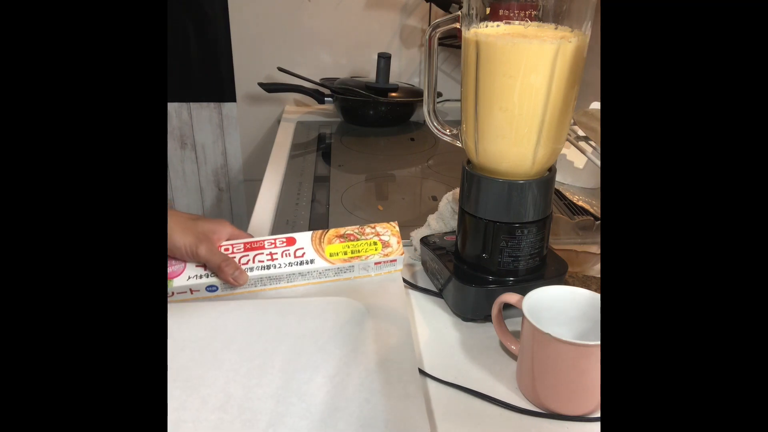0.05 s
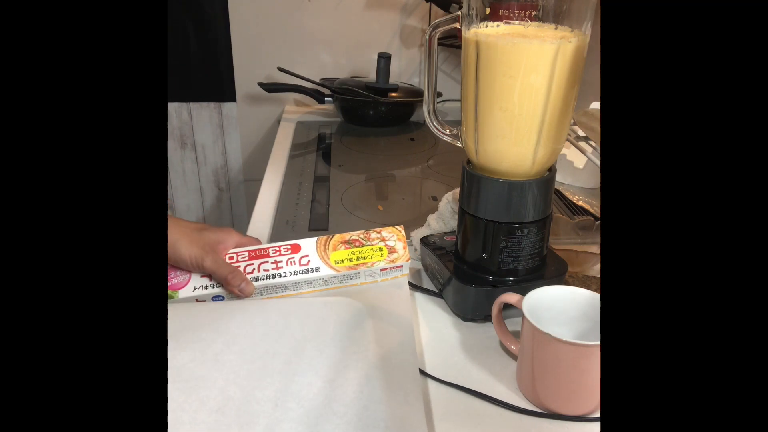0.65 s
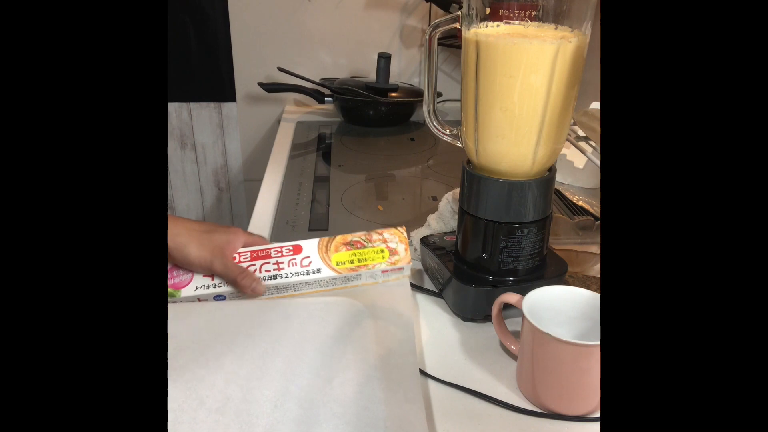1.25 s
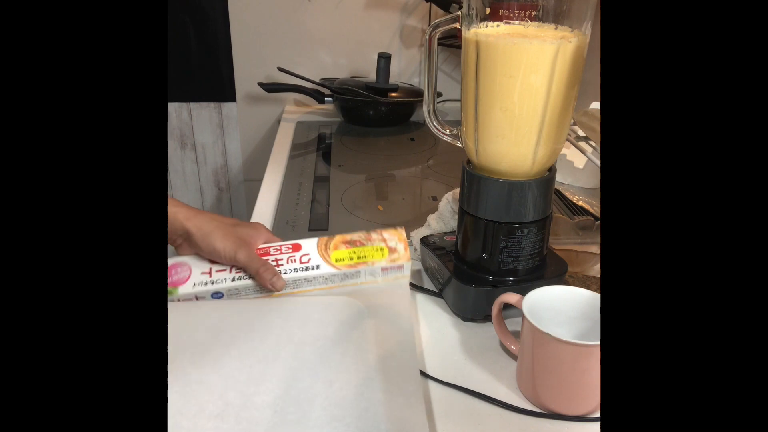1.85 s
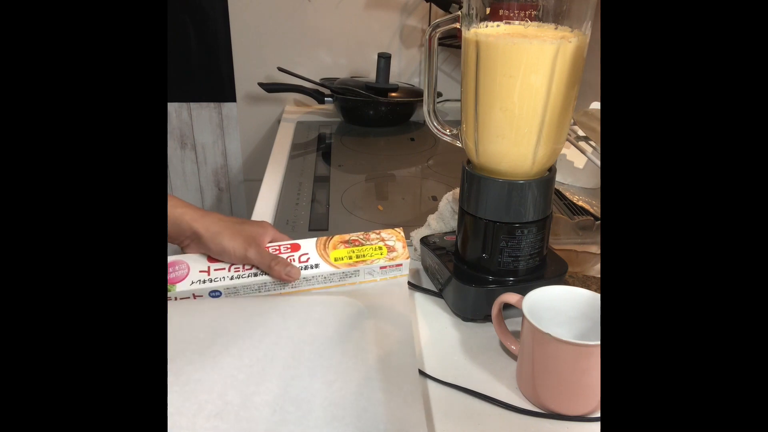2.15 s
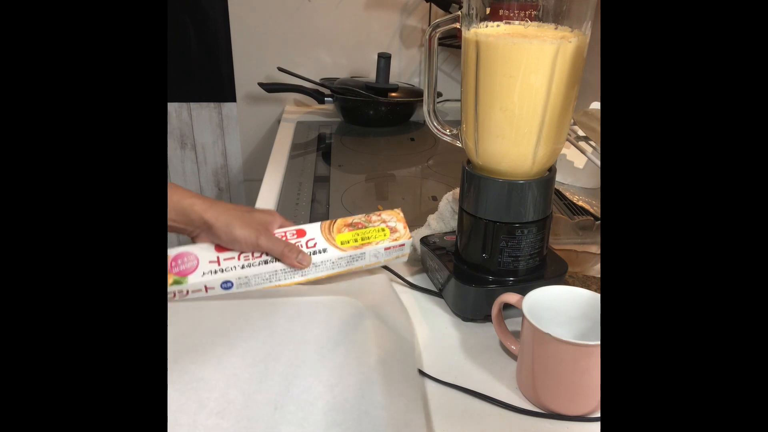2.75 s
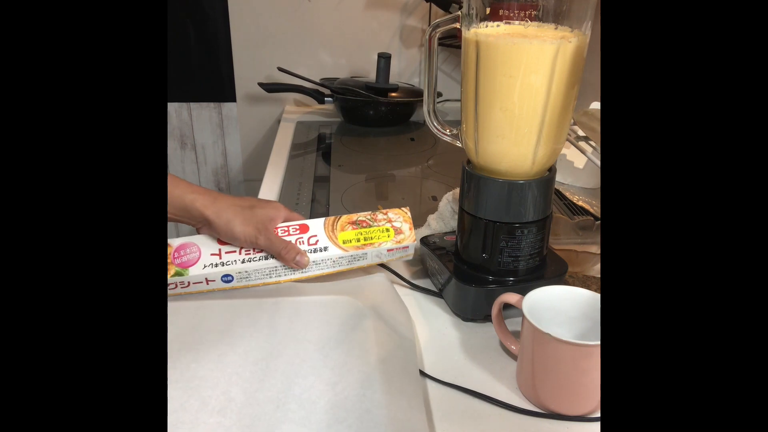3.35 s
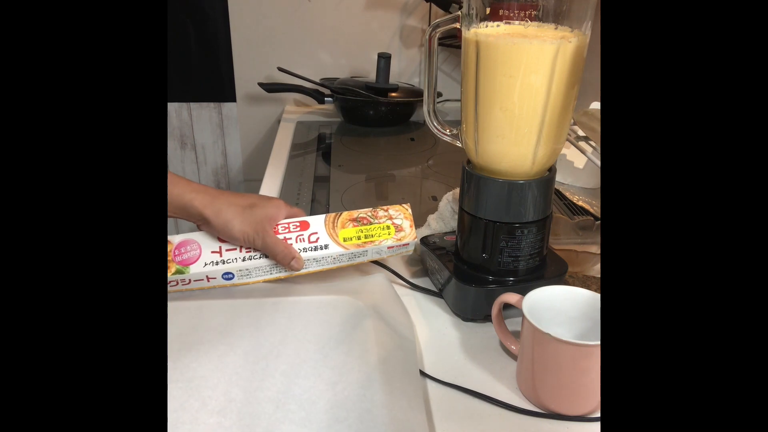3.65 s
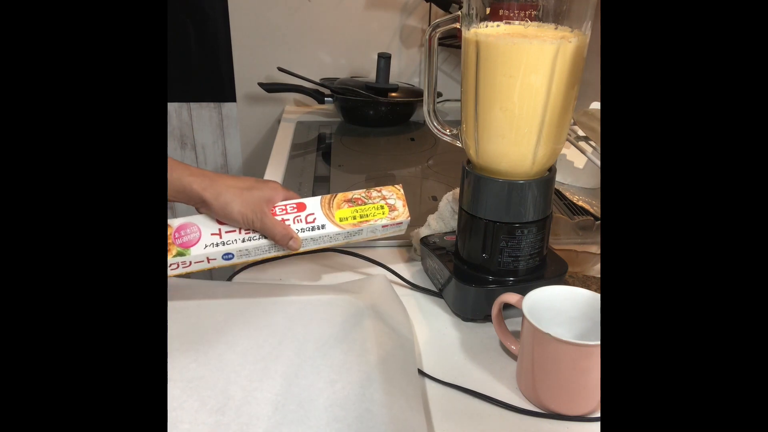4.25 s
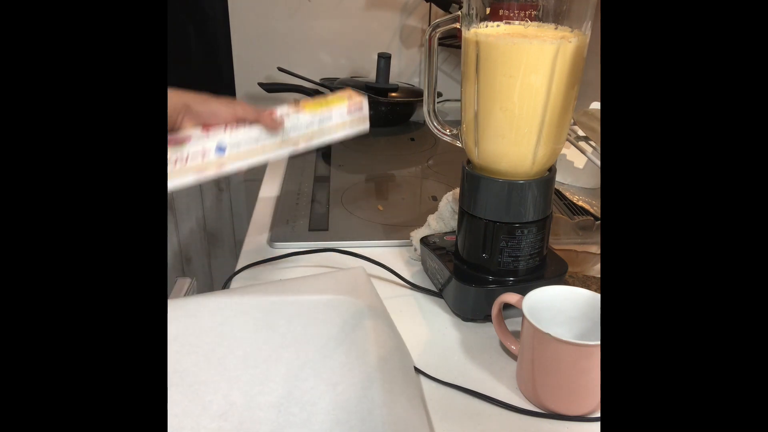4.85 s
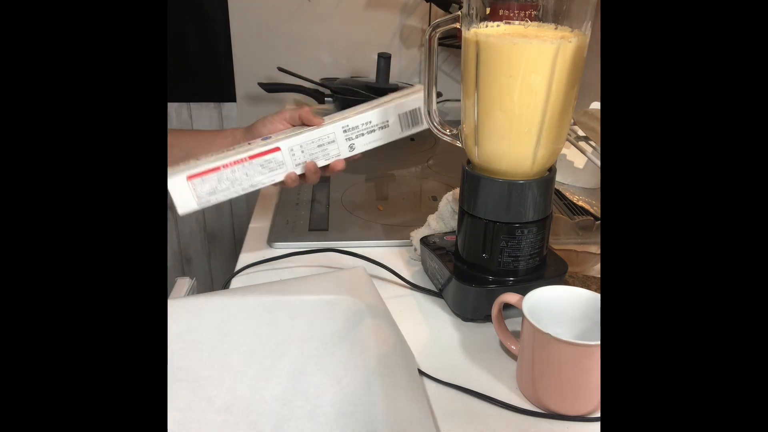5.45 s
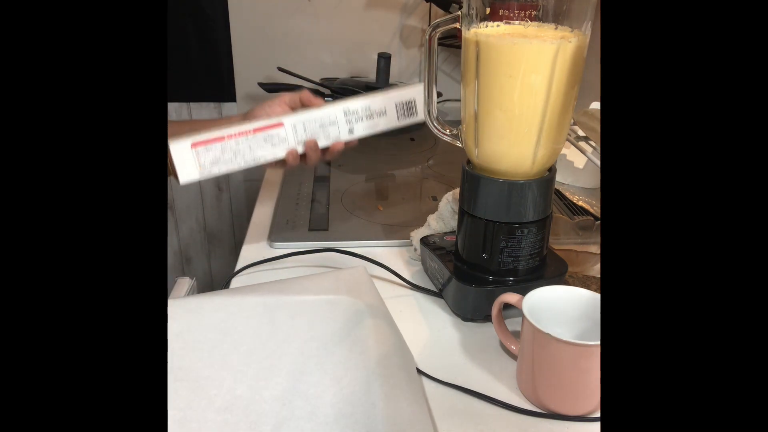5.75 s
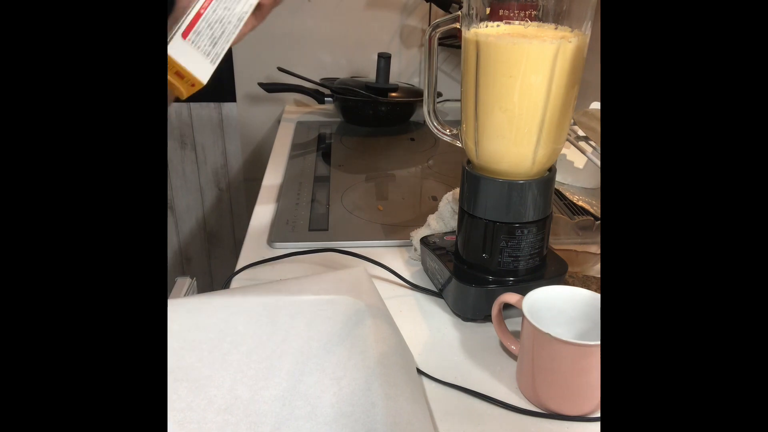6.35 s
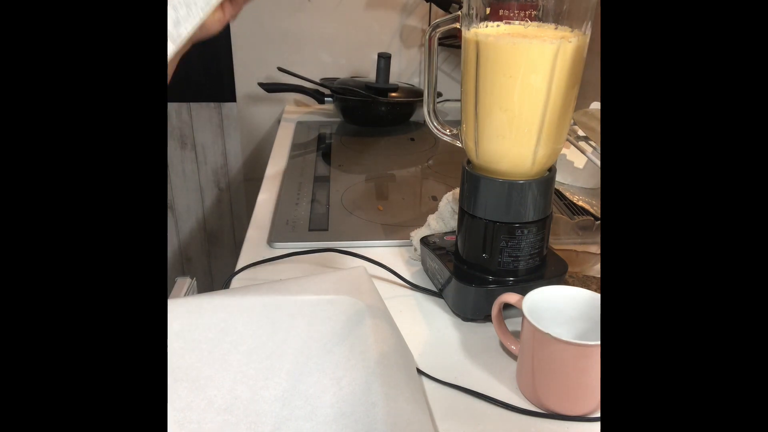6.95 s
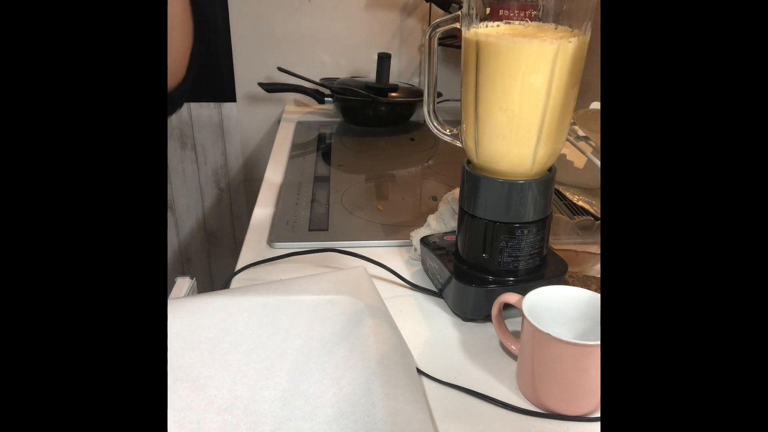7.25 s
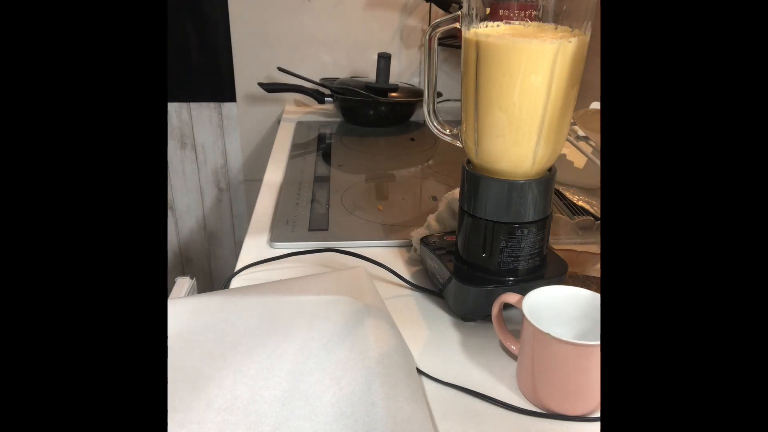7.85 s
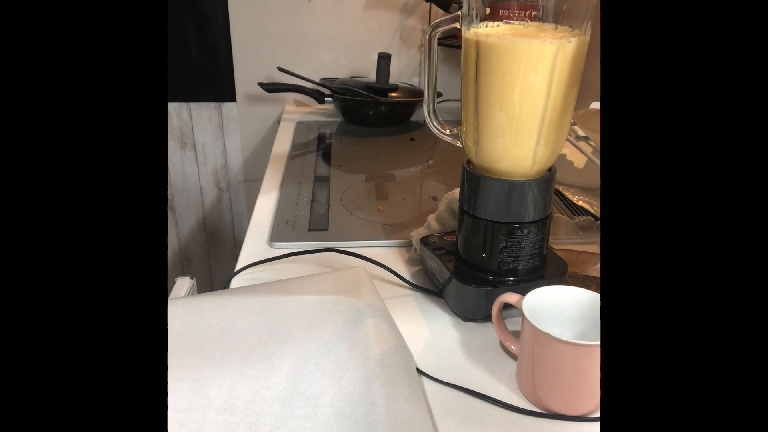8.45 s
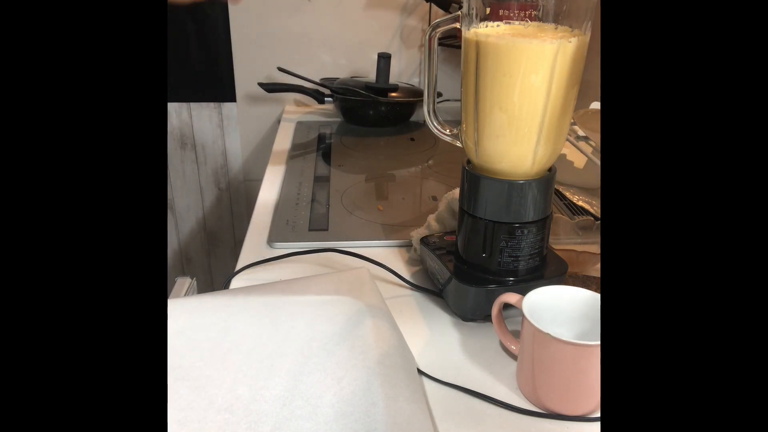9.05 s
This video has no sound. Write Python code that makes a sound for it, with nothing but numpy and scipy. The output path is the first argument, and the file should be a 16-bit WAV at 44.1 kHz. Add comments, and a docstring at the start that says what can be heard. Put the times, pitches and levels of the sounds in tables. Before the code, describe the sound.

Stiff paper crinkles and rips along a toothed cutter, with sharp cardboard pops and soft knocks as the box is put away.

```python
"""In a small kitchen, close by, baking paper is drawn from its cardboard box and torn off in a few pulls.
The stiff sheet rustles as it slides and snaps as its creases flip; the carton pops under the thumb.
Fibres break as the cutter's teeth bite through. Then fingers turn the box over, and it knocks against
things as it is put away. Mains appliances hum faintly and the room answers with a short echo."""
import sys
import numpy as np
from scipy import signal
from scipy.fft import rfft, irfft, next_fast_len
from scipy.io import wavfile
from scipy.ndimage import map_coordinates

SR = 44100
rng = np.random.default_rng(int(sys.argv[2]) if len(sys.argv) > 2 else 0)


def unload_wav(signal):
    """Save mono or channel-first audio to the path in sys.argv[1] as 16-bit WAV at rate SR, clipped to [-1, 1]."""
    wavfile.write(
        sys.argv[1],
        SR,
        np.round(np.clip(np.atleast_2d(signal).T, -1, 1) * 32767).astype(np.int16),
    )


N = 404838


def amp(db):
    """Turn decibels into a number to multiply by."""
    return 10 ** (np.asarray(db) / 20)

def unit(x):
    """Scale a sound to an average power of one."""
    return x / np.sqrt(np.mean(x ** 2) + 1e-20)

def along(points, hz):
    """Read between the (Hz, value) points of a table, on a scale of octaves."""
    pitches, values = np.transpose(points)
    return np.interp(np.log(hz + 1), np.log(pitches), values)

def wobble(rate):
    """A smooth random curve through `rate` points a second."""
    knots = rng.standard_normal(int(N * rate / SR) + 4)
    steps = np.arange(0, len(knots) - 1, 1 / 16)
    return np.interp(np.arange(N) * rate / SR, steps, map_coordinates(knots, [steps]))

def add(track, start, x):
    """Mix x into the track from `start` seconds on."""
    i = max(round(start * SR), 0)
    track[i:i + len(x)] += x[:max(N - i, 0)]

def coloured(x, spectrum, tilt=0, bend_delay=0):
    """Shape a sound's tone. Low ripples reach the sheet's edge later: bend_delay seconds at 1 kHz."""
    size = 2 * next_fast_len(len(x) // 2 + 2048)
    hz = np.fft.rfftfreq(size, 1 / SR)
    level = along(spectrum, hz) + tilt * np.log2(np.maximum(hz, 1400) / 3000)
    # make the filter ring only after a click, never before it
    cepstrum = irfft(np.log(amp(level)))
    cepstrum[1:size // 2] *= 2
    cepstrum[size // 2 + 1:] = 0
    lag = 4 * np.pi * bend_delay * np.sqrt(1000 * hz)
    return irfft(rfft(x, size) * np.exp(rfft(cepstrum) - 1j * lag))[:len(x)]

def noise(samples, spectrum):
    """Steady noise with the given tone."""
    return unit(coloured(rng.standard_normal(samples), spectrum))

def crackle(rate, spread_db):
    """Tiny clicks of uneven size at random moments, about `rate` a second."""
    size = amp(spread_db * np.clip(rng.standard_normal(N), -2, 2)) * rng.choice([-1, 1], N)
    return unit(size * (rng.random(N) < rate / SR))


# The tone of the room's noise. Each row: pitch in Hz, level in dB.
AIR_TONE = [(20, -48), (40, -19), (80, -12.5), (125, -5.5), (170, -9.5), (220, -12), (310, -17.5),
            (450, -18), (850, -22.5), (1150, -20.5), (2200, -27), (4500, -35), (10000, -42.5),
            (15800, -40.5)]
# The appliances' notes. Each row: pitch in Hz, level in dB, waver in dB.
HUM_NOTES = [(119, -64, 3.5), (161.8, -68, 2.5), (352.7, -65.5, -1.2), (1130, -79, 2.5), (2250, -78.5, 2)]

def room_hum(air_db=-58, drift=0.22):
    """Appliances hum, wavering slightly, over steady room noise."""
    hum, t = np.zeros(N), np.arange(N) / SR
    for hz, db, waver in HUM_NOTES:
        gain = np.sqrt(2) * amp(db + waver * wobble(2.4))
        hum += gain * np.sin(2 * np.pi * hz * t + drift * waver * wobble(4))
    return hum + amp(air_db) * noise(N, AIR_TONE)


def stroke_gains(rows, speed_power=0.88):
    """The hand speeds up and slows down in each stroke; rustle and hiss rise and fall with it."""
    t, gains = np.arange(N) / SR, np.zeros((2, N))
    for middle, length, rustle_db, hiss_db in rows:
        moving = np.abs(t - middle) < length / 2
        speed = np.abs(np.cos(np.pi * (t[moving] - middle) / length))
        gains[:, moving] += amp([[rustle_db], [hiss_db]]) * speed ** speed_power
    return gains

# The tones of rubbed paper's rustle and of its surface hiss. Each row: pitch in Hz, level in dB.
RUSTLE_TONE = [(150, -40), (250, -4.5), (459, -4), (720, -1.5), (1090, 3.5), (1280, 3.5), (1710, 3.5),
               (2990, -2.5), (3430, -2), (4860, -9), (6640, -11.5), (10800, -35), (12000, -24.5),
               (15800, -30.5)]
HISS_TONE = [(1500, -28), (5000, 1.5), (7500, -0.5), (10300, -5.5), (12000, -2), (16000, -6.5)]

def rubbing(gains, rustle_db, hiss_db, grain_rate, clump_db, tick_db):
    """Dry rubbing: clumps of tiny clicks set the paper sounding, with surface hiss and stray ticks."""
    rustle_gain, hiss_gain = gains
    grains = unit(crackle(grain_rate, spread_db=2.5) * amp(clump_db * wobble(70)))
    rustle = unit(coloured(grains + .5 * rng.standard_normal(N), RUSTLE_TONE, bend_delay=0.000978))
    tick_tone = [(300, -21.5), (1200, 0), (3500, 3.5), (8000, -16), (16000, -20.5)]
    ticks = unit(coloured(crackle(rate=55, spread_db=3), tick_tone, bend_delay=0.000968))
    fine_grains = crackle(rate=3300, spread_db=4.5) * amp(clump_db * wobble(45))
    hiss = unit(coloured(fine_grains, HISS_TONE))
    return rustle_gain * (amp(rustle_db) * rustle + amp(tick_db) * ticks) + hiss_gain * amp(hiss_db) * hiss

# The hand moves the sheet. Each row: middle in seconds, length in seconds, rustle in dB, hiss in dB.
SHEET_MOVES = [(0.053, 0.12, -44.5, -71), (0.311, 0.24, -45, -54), (0.672, 0.25, -51.5, -73),
               (0.876, 0.092, -49, -79), (0.988, 0.085, -52, -85), (1.15, .18, -54, -78),
               (1.299, 0.14, -43, -63), (1.453, 0.17, -44.5, -55), (1.637, 0.21, -34.5, -50),
               (1.778, 0.095, -44, -71), (1.926, 0.17, -35, -62), (2.073, .16, -42.5, -76),
               (2.294, 0.16, -45, -59), (2.479, .28, -44.5, -45.5), (3.296, .24, -60.5, -60),
               (4.469, 0.13, -42, -64), (4.618, 0.18, -54.5, -65), (4.736, 0.1, -42, -72),
               (4.831, 0.088, -51, -78), (4.925, 0.086, -55.5, -55.5)]

def sliding_sheet(held_until_s=5, held_rustle_db=-59, held_hiss_db=-81):
    """The sheet rustles as it slides and bends, and stirs faintly as long as it is held."""
    stir = amp([[held_rustle_db], [held_hiss_db]]) * (np.arange(N) / SR < held_until_s)
    gains = stroke_gains(SHEET_MOVES) + stir
    return rubbing(gains, rustle_db=-1, hiss_db=1, grain_rate=3300, clump_db=5, tick_db=-17)


# The tone of snapping paper. Each row: pitch in Hz, level in dB.
PAPER_TONE = [(60, -30), (250, -13.5), (700, -8.5), (1000, -1), (1900, -3.5), (3800, 1), (5500, -4.5),
              (8000, -4), (10300, -10.5), (11500, -5), (16000, -10)]

def snap(db, tilt, length, crack, shiver_db, shiver_s):
    """A crease or a few fibres give way: one crack, a rush of smaller ones, and a brief shiver."""
    t = np.arange(SR // 16) / SR
    rush = np.exp(-(t / length) ** 2)
    shiver = amp(shiver_db) * np.exp(-t / shiver_s)
    burst = rng.standard_normal(len(t)) * (rush + shiver)
    burst[0] += crack
    shift = np.exp(.11 * rng.standard_normal())  # each patch of paper has its own size, so its own pitch
    tone = [(hz * shift, level) for hz, level in PAPER_TONE]
    sound = coloured(burst, tone, tilt, bend_delay=0.001211)
    return amp(db) * np.sqrt(length * SR) * sound / np.linalg.norm(sound)

# The main snaps: the sheet's creases, and the sharp clicks of the carton popping at 2.3245 and 2.65 s. # Each
# row: start in seconds, level in dB, treble tilt in dB per octave, length in seconds.
MAIN_SNAPS = [(0.042, -31.5, -7, 0.0061), (0.259, -32, -1.3, 0.0067), (0.33, -32, 11, 0.0037),
              (0.6405, -34.5, -1, 0.0032), (0.689, -36, -4, .0035), (0.832, -30.5, 1, 0.0063),
              (1.0876, -39.5, 0.5, 0.0031), (1.324, -29.5, -1, 0.0036), (1.397, -34.5, -1, 0.0036),
              (1.5495, -34, 0, 0.0047), (1.6214, -25, -2.5, 0.0053), (1.698, -32, -1, 0.0079),
              (1.816, -35.5, -4.5, .0042), (1.931, -34.5, -2, .0045), (2.203, -21, 1.5, 0.0032),
              (2.3245, -15.5, 1, 0.0018), (2.401, -30.5, 5.5, .0021), (2.425, -30, 4, 0.0017),
              (2.4931, -21.5, 0, 0.0056), (2.529, -20, 1.5, 0.0036), (2.547, -29.5, 1.5, .0056),
              (2.65, -9.5, 1, .0024), (2.913, -35.5, -1.5, 0.0029), (3.083, -42, -0.5, 0.002),
              (3.1866, -40, -3, 0.0058), (4.4627, -30, -3, 0.012), (4.5538, -36.5, -3.5, 0.0026),
              (4.59, -36.5, -1.5, 0.0027), (4.7315, -32, -5, 0.0083), (5.316, -45.5, -12, 0.0054),
              (5.417, -39, -5, 0.0072), (5.5155, -39, -4.5, 0.0068), (5.576, -47.5, -3, .004),
              (6.0596, -47, -5, 0.0061)]

def creases(gain_db=-1, per_stroke=3, small_tilt=-6, small_s=0.0026):
    """Creases flip over and the carton clicks: the main snaps at set times, small creases at random within each
    sheet stroke."""
    out, small = np.zeros(N), []
    for middle, length, rustle_db, _ in SHEET_MOVES:
        for _ in range(per_stroke):
            start = middle + length * rng.uniform(-1, 1) / 2
            small.append((start, rustle_db + rng.normal(1.5, 2.5), small_tilt, small_s))
    for start, db, tilt, length in MAIN_SNAPS + small:
        add(out, start, snap(db + gain_db, tilt, length, crack=4.2, shiver_db=-14.5, shiver_s=0.012))
    return out


# The carton's pops. Each row: start in seconds, level in dB, pitch in Hz, seconds to fade by 60 dB.
CARTON_POPS = [(0.4186, -20, 1560, 0.0058), (0.4522, 3, 1710, 0.0066), (2.0327, -26, 1780, 0.012),
               (2.3243, -12, 1276, 0.014), (2.6516, -3.5, 1520, 0.012), (2.9144, -21, 1810, 0.0067),
               (4.657, -36, 1310, 0.031), (5.962, -37, 1140, .024), (7.741, -41, 770, 0.029)]
# The notes in one pop. Each row: multiple of the pop's pitch, level in dB.
PANEL_NOTES = [(.74, -17), (.88, -8.5), (1, 1), (1.24, -6.5), (1.55, -9), (2.35, -19.5)]

def carton_pops(gain_db=-1, attack_s=0.00062, tick_db=-20):
    """A cardboard panel buckles under the thumb with a click and rings for just a few cycles."""
    out, t = np.zeros(N), np.arange(SR // 10) / SR
    for start, db, hz, fade_s in CARTON_POPS:
        ring = sum(amp(level) * np.sin(2 * np.pi * hz * multiple * t) for multiple, level in PANEL_NOTES)
        tick = amp(tick_db) * noise(len(t), PAPER_TONE) * amp(-60 * t / 0.01)
        pop = ring * (1 - np.exp(-t / attack_s)) * amp(-60 * t / fade_s) + tick
        bass_cut = [(hz / 8, -32), (hz * .42, -14), (hz * .62, 0)]  # a small panel gives off little bass
        add(out, start, amp(db + gain_db) * coloured(pop, bass_cut))
    return out


# Box and hand bump together. Each row: start in seconds, level in dB, pitch in Hz.
HAND_BUMPS = [(0.472, -39, 433), (0.477, -45, 115), (1.567, -41, 169), (1.63, -40, 95),
              (2.756, -40.5, 115.3), (4.383, -38.5, 139), (6.532, -43, 220), (6.55, -38, 110),
              (6.779, -41.5, 127.7), (7.741, -47, 222), (8.94, -44.5, 191), (9.05, -44, 187)]

def thuds(rows, attack_s=0.0043, fade_s=0.13):
    """Soft bumps on the box give dull, hollow thuds."""
    out, t = np.zeros(N), np.arange(SR // 4) / SR
    for start, db, hz in rows:
        body = noise(len(t), [(hz / 4, -36), (hz * 0.51, -7), (hz, 0), (hz * 2, -14), (hz * 8, -55)])
        add(out, start, amp(db) * body * (1 - np.exp(-t / attack_s)) * amp(-60 * t / fade_s))
    return out


def pull_gain(t, held, release, attack_s=0.0018, swell_db=2.5):
    """A pull starts sharply, swells as the hand leans in, then lets go."""
    rise_db = swell_db * (np.clip(t / held, 0, 1) - 1)
    fall_db = release * np.maximum(t - held, 0)
    return np.clip(t / attack_s, 0, 1) * amp(rise_db - fall_db)

# Steady pulls along the cutter. Each row: start in seconds, seconds held, level in dB,
# fade in dB per second, extra level of the teeth in dB.
STEADY_PULLS = [(2.652, 0.1, -19, 234, 2.5), (3.913, 0.12, -25.5, 170, 5.5), (4.17, 0.022, -30, 257, 1),
                (4.307, 0.077, -22.5, 446, -4)]
# The tone of ripping paper. Each row: pitch in Hz, level in dB.
RIP_TONE = [(47, -47), (80, -15), (212, -18), (282, -13.5), (781, -6), (911, 0.5), (1160, -2), (1300, 0.5),
            (2260, -1), (2410, -5.5), (2750, 0.5), (4010, -2), (10200, -10), (12400, -8.5), (15800, -15)]

def tearing(gain_db=-1, jerk_db=2.5):
    """Fibres break in their thousands during each pull, in uneven jerks."""
    t = np.arange(N) / SR
    pull = sum(amp(db) * pull_gain(t - start, held, release) for start, held, db, release, _ in STEADY_PULLS)
    breaks = unit(crackle(rate=7000, spread_db=1) * amp(jerk_db * wobble(260)))
    return amp(gain_db) * pull * unit(coloured(breaks, RIP_TONE, bend_delay=.0012))

def cutter_teeth(gap_s=.0185, jitter_s=.0015):
    """During a steady pull, one tooth after another snaps through the sheet."""
    out = np.zeros(N)
    for start, held, db, release, teeth_db in STEADY_PULLS:
        for k in range(1, 10):
            delay = k * gap_s + jitter_s * rng.standard_normal()
            tooth = snap(db + teeth_db, tilt=-0.36, length=0.007, crack=5, shiver_db=-18.5, shiver_s=.011)
            add(out, start + delay, pull_gain(delay, held, release) * tooth)
    return out


# The sheet catches on the cutter. Each row: start in seconds, level in dB.
CUTTER_BITES = [(3.3541, -27), (3.389, -24.5), (3.4089, -19.5), (3.4357, -23), (3.4662, -23.5),
                (3.5025, -16.5), (3.5304, -21.5), (3.5589, -18), (3.6205, -22.5), (3.6284, -20),
                (3.6551, -21.5), (3.7077, -27), (3.809, -31.5), (3.8697, -28.5), (3.8797, -24.5),
                (3.8897, -21.5), (3.9127, -19), (4.0194, -16), (4.108, -22.5), (4.1578, -18),
                (4.249, -31.5), (4.305, -22)]

def cutter_bites(gain_db=-.5, typical_db=-21.5, doubling_db=8.5, jolt_db=-21.5, jolt_hz=340):
    """The caught sheet gives way in one jerk, which also jolts the box."""
    out = np.zeros(N)
    for start, db in CUTTER_BITES:
        length = 0.0057 * 2 ** ((db - typical_db) / doubling_db)  # harder bites run further
        bite = snap(db + gain_db, tilt=-0.36, length=length, crack=2.6, shiver_db=-5, shiver_s=0.019)
        add(out, start, bite)
    jolts = [(start, db + jolt_db, jolt_hz) for start, db in CUTTER_BITES]
    return out + thuds(jolts)


# Fingers move on the box. Each row: middle in seconds, length in seconds, rustle in dB, hiss in dB.
FINGER_MOVES = [(5.15, 0.84, -61, -68.5), (5.48, 0.22, -49.5, -54.5), (5.85, 0.64, -63, -86),
                (7.5, 0.11, -76, -65.5), (8.05, 0.25, -61.5, -60), (8.25, 0.26, -65, -65),
                (8.85, 0.26, -68.5, -68), (9.04, 0.27, -56.5, -66)]

def sliding_fingers():
    """Fingers rub over the cardboard as the box is turned over and put away."""
    gains = stroke_gains(FINGER_MOVES)
    return rubbing(gains, rustle_db=-2.5, hiss_db=-1.5, grain_rate=3000, clump_db=2, tick_db=-5)


# The box knocks against things. Each row: start in seconds, level in dB, seconds to fade by 60 dB.
BOX_KNOCKS = [(6.531, -50, 0.1), (6.749, -31.5, 0.15), (6.773, -36.5, 0.21), (7.116, -39, 0.041),
              (7.628, -50.5, 0.05), (7.741, -43.5, 0.067), (8.209, -53.5, 0.14), (8.644, -43.5, 0.13),
              (8.93, -47.5, .1), (9.095, -47, 0.16)]
# The tone of the knocked box. Each row: pitch in Hz, level in dB.
BOX_TONE = [(80, -12.5), (280, 4.5), (450, -2.5), (800, 0), (1150, 2.5), (1700, 1), (2500, -3), (3150, 0),
            (4500, -8.5), (6500, -14), (9000, -24.5), (16000, -29)]

def box_knocks(gain_db=1, attack_s=0.0029):
    """The hollow box and the roll inside it clatter and quickly fall quiet."""
    out, t = np.zeros(N), np.arange(SR // 4) / SR
    for start, db, fade_s in BOX_KNOCKS:
        clatter = noise(len(t), BOX_TONE) * (1 - np.exp(-t / attack_s)) * amp(-60 * t / fade_s)
        add(out, start, amp(db + gain_db) * clatter)
    return out


# How long the kitchen rings. Each row: pitch in Hz, seconds to fade by 60 dB.
ECHO_FADES = [(150, 0.79), (1500, 0.28), (5000, 0.28), (15000, 0.12)]

def kitchen_echo(x, early_db=-11, late_db=-12, early_s=0.014, build_s=0.0017):
    """Worktop and walls answer at once, then the room dies away in a short, smooth echo."""
    out, hop = np.zeros(N), SR // 10
    window = np.sin(np.pi * np.arange(2 * hop) / (2 * hop))
    padded = np.pad(x, (0, 2 * hop))
    for start in range(0, N, hop):  # each overlapping slice of sound gets its own random echoes
        hz, ages, bands = signal.stft(rng.standard_normal(SR // 3), SR, nperseg=256)
        fade = amp(-60 * ages / along(ECHO_FADES, hz)[:, None])
        tail = signal.istft(bands * fade, SR, nperseg=256)[1]
        t = np.arange(len(tail)) / SR
        tail *= np.clip(t / build_s, 0, 1)
        bounces = rng.standard_normal(len(t)) * (rng.random(len(t)) < .1)
        early = bounces * np.exp(-t / early_s) * (t > .003)
        echo = amp(early_db) * early / np.linalg.norm(early) + amp(late_db) * tail / np.linalg.norm(tail)
        add(out, start / SR, signal.fftconvolve(padded[start:start + 2 * hop] * window, echo))
    return out


def scene():
    """Paper and box close by, in the humming kitchen."""
    paper = sliding_sheet() + creases() + tearing() + cutter_teeth() + cutter_bites()
    box = carton_pops() + thuds(HAND_BUMPS) + sliding_fingers() + box_knocks()
    near = paper + box
    return (near + kitchen_echo(near) + room_hum())[None]

def record(dry, ceiling=.85, top_hz=15950):
    """Round off the very highest peaks and cut away the highest treble."""
    rounded = dry / (1 + (dry / ceiling) ** 6) ** (1 / 6)
    size = next_fast_len(N + SR // 2)
    passband = np.clip((top_hz - np.fft.rfftfreq(size, 1 / SR)) / 300 + .5, 0, 1)
    return irfft(rfft(rounded, size) * passband, size)[..., :N]


dry = scene()
out = record(dry)
unload_wav(out)
```